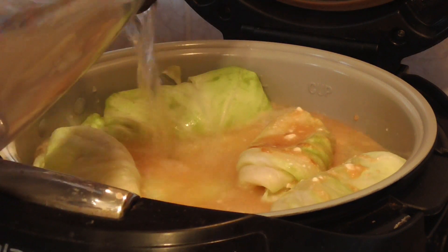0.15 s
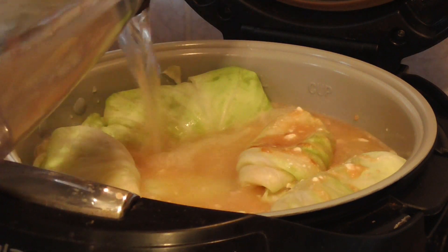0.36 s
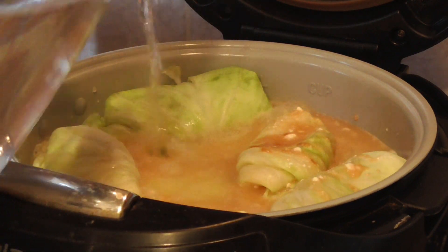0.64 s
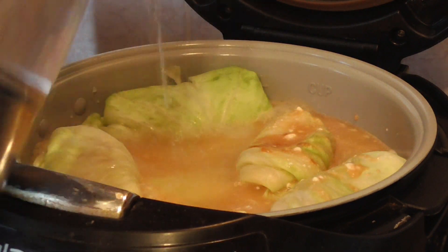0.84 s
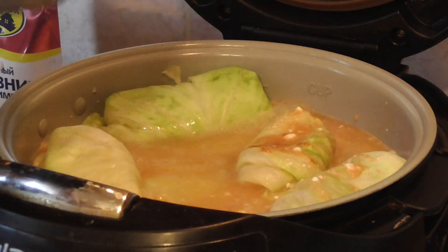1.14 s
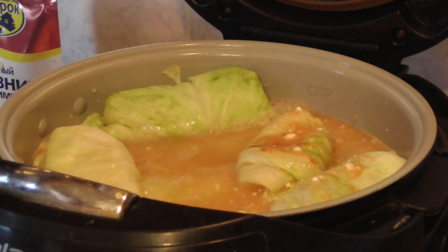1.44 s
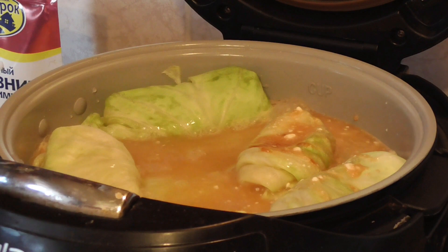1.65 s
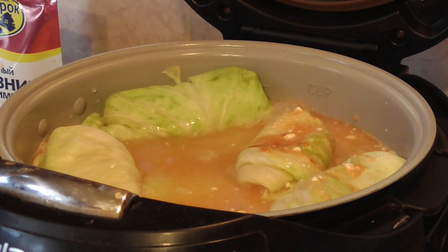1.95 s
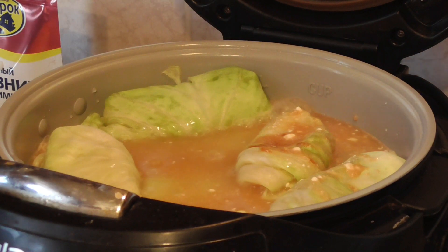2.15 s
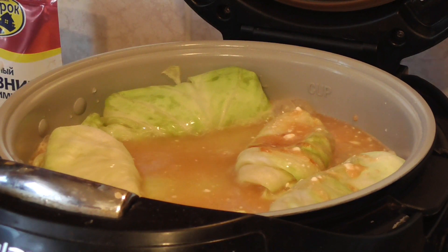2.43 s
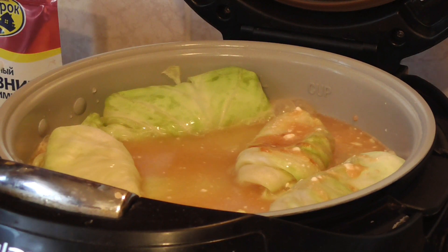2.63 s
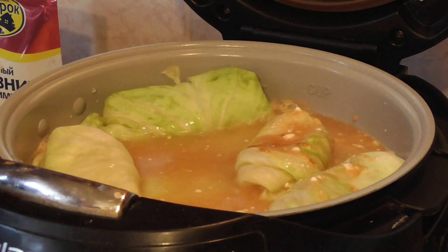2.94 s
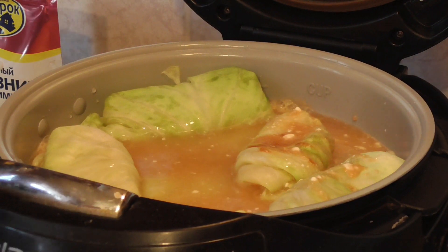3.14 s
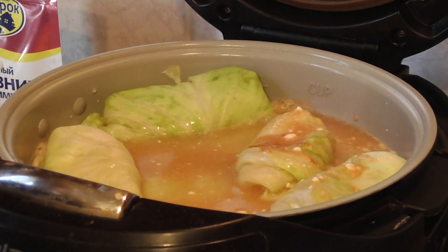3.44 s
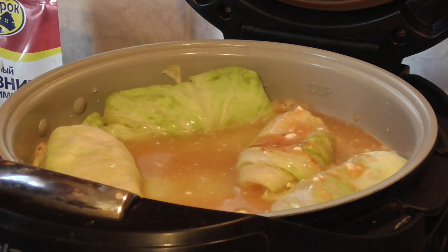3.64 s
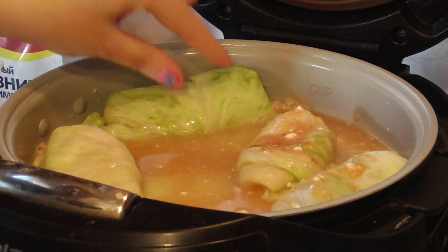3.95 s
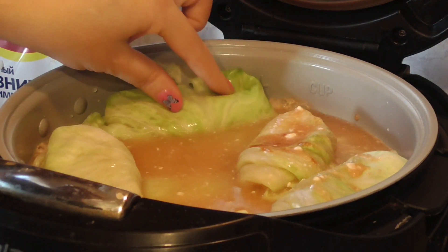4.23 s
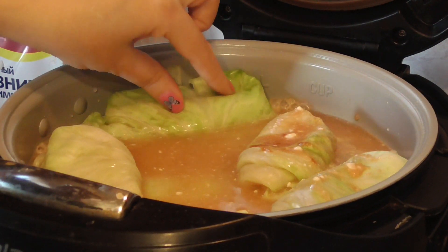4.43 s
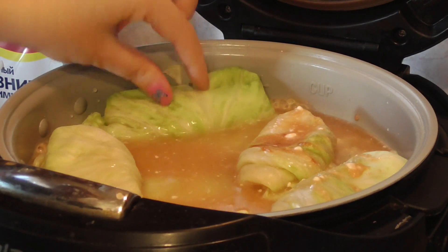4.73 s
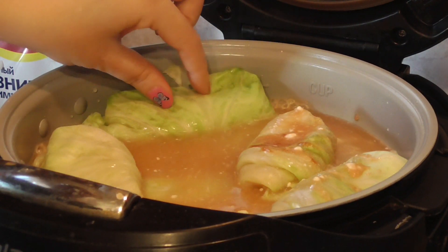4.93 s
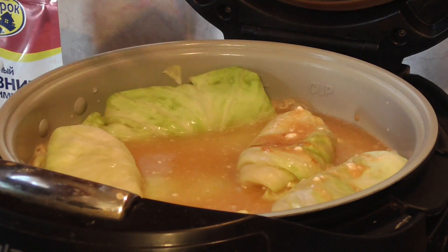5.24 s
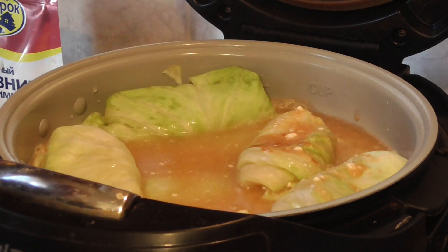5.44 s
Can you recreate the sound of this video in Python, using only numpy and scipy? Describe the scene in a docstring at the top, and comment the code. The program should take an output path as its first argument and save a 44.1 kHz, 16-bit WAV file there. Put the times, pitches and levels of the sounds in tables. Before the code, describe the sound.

Water pours from a jug into a pot of sauce, spitting and bubbling for about a second while the jug bumps the cooker twice. The jug is then set down on the worktop, slightly to the left, rocking and landing with loud, hollow knocks that leave a metal vessel ringing faintly. Soft handling bumps and tiny wet ticks follow, heard close up in a small kitchen with a low fridge hum.

```python
"""Water runs from a jug into a pot of sauce: its last stream spits and slops as swarms of ringing
bubbles, then foam fizzes on. The jug bumps the cooker twice, booming its housing. Set down on the
worktop, it rocks and lands hard, leaving a metal vessel ringing. Small handling noises and wet
ticks follow in a small kitchen where a fridge compressor hums."""
import sys
import numpy as np
from scipy import signal
from scipy.fft import rfft, irfft, next_fast_len
from scipy.io import wavfile

SR = 44100
rng = np.random.default_rng(int(sys.argv[2]) if len(sys.argv) > 2 else 0)


def wrap_up_sound(samples):
    """Save the sound to the file named by the first command line argument, as 16-bit audio."""
    columns = np.atleast_2d(samples).T
    # keep every value between -1 and 1, then stretch to whole-number steps
    tamed = np.clip(columns, -1, 1)
    steps = np.round(tamed * 32767).astype(np.int16)
    wavfile.write(sys.argv[1], SR, steps)


N = 246078
TIME = np.arange(N) / SR
HIT_TIME = TIME[:16384]

# stream envelope: (time [s], spray level [dB], relative slop level [dB])
POUR = [(0.0, -50, -60), (0.296, -69, -47.5), (0.45, -55, -51), (0.8, -59, -47.5), (0.876, -50.5, -58),
        (1.012, -51, -77), (1.15, -84, -56)]
# spray spectrum: (frequency [Hz], gain [dB])
SPRAY_EQ = [(500, 2), (1300, -3), (2000, -8), (2700, -7), (3500, 1), (4600, 1.5), (6000, -2.5), (8000, 1),
            (9500, 2), (12500, 0), (15500, -13)]
# sauce spectrum: (frequency [Hz], gain [dB])
SLOP_EQ = [(200, -3), (450, 3.5), (900, -7), (1300, 0.5), (1800, -1), (2100, -3), (3000, -24), (6000, -29)]
POUR_END_S = 0.97

def stream():
    """The stream whips up fine spray and slops in thick sauce, which damps its bubbles quickly."""
    s, spray_db, slop_db = np.transpose(POUR)
    running = np.interp(TIME, [POUR_END_S, POUR_END_S + 0.51], [1, 0])
    spray = bubbles(1.3, 1200, 16400, cycles=11, spread_db=5.6, count=5200)
    plips = bubbles(1.3, 700, 2300, cycles=16, spread_db=4, count=450)
    pats = bubbles(1.3, 350, 3000, cycles=6, spread_db=4.8, count=750)
    spray = colour(spray, SPRAY_EQ) * undb(np.interp(TIME, s, spray_db))
    slop = colour(pats + undb(-1) * plips, SLOP_EQ) * undb(np.interp(TIME, s, slop_db) - 11.5)
    return running * (spray + slop)


# fizz spectrum: (frequency [Hz], gain [dB])
FOAM_EQ = [(2000, -3), (4500, -8), (6000, -7), (8000, -3.5), (10000, 3), (12500, 3), (15500, -7.5)]
FOAM_DB, FOAM_FALL_DB_PER_S = -62.5, 4.5

def foam():
    """Tiny bubbles fizz and thin out after the pour; larger ones fade as the sauce settles."""
    fizz = bubbles(N / SR, 3430, 16200, cycles=5.4, spread_db=2.7, count=7000)
    fizz_db = FOAM_DB - FOAM_FALL_DB_PER_S * np.maximum(TIME - POUR_END_S, 0)
    settling = bubbles(2.3, 450, 2600, cycles=10, spread_db=5, count=300)
    return colour(fizz, FOAM_EQ) * undb(fizz_db) + settling * undb(-65 - 8 * TIME)


# loudest drops and bursting bubbles: (time [s], level [dB], pitch [Hz])
DROPS = [(0.0217, -49, 10200), (0.033, -44.5, 9500), (0.235, -66, 3580), (0.268, -58, 10000),
         (0.2749, -43, 9500), (.295, -53, 12100), (0.3192, -49.5, 10100), (0.369, -47, 9600),
         (0.378, -38.5, 9250), (0.4066, -54, 1240), (0.4316, -51, 12300), (.535, -48, 10500),
         (.558, -50, 9500), (.582, -51, 10500), (0.62, -37, 12200), (0.71, -45, 11700), (.739, -44, 8800),
         (.808, -37.5, 4130), (0.841, -40.5, 9600), (0.8464, -39, 11500), (0.874, -43.5, 3500),
         (0.8877, -46, 4400), (.924, -43.5, 12200), (.932, -43, 6800), (0.959, -48, 11400),
         (1.499, -64, 10900), (1.945, -62, 11900), (2.189, -58, 8140), (3.132, -63, 7000),
         (3.593, -59, 12700), (3.611, -54, 8000), (4.074, -66, 13900), (4.116, -67.5, 7340),
         (4.615, -65.5, 11950), (4.619, -60, 1070), (4.66, -70, 13000), (4.678, -62, 6400),
         (5.01, -72, 12300), (5.311, -59, 6800), (5.505, -64, 8600)]
SPLAT_HZ, DRIBBLE_S = 9500, 0.26

def drops():
    """Spits, last drips and lone bursting bubbles; big, low drops ring less and splat more and lower."""
    out = np.zeros(N)
    spits = scatter(0, POUR_END_S, db=-53.5, spread_db=4.5, low_hz=5500, high_hz=13000, count=20)
    ticks = scatter(POUR_END_S, N / SR, db=-68, spread_db=2, low_hz=8000, high_hz=14000, count=10)
    drips = scatter(POUR_END_S, POUR_END_S + DRIBBLE_S, db=-56, spread_db=3,
                    low_hz=1000, high_hz=2600, count=5)
    for s, db, hz in DROPS + spits + drips + ticks:
        splat_share = SPLAT_HZ / np.hypot(SPLAT_HZ, hz)
        ping = burst(np.convolve(bubble(hz, cycles=27, glide=0.13), rattle(0.0017)[:512]))
        spit = burst(colour(rattle(0.023)[:2048], SPRAY_EQ))
        pat = burst(colour(rattle(0.031)[:2048], SLOP_EQ))
        add(out, s, undb(db) * np.sqrt(1 - splat_share ** 2) * ping)
        add(out, s, undb(db - 4) * splat_share * burst(spit + 2200 / hz * pat))
    return out


# splashes that drag air under: (time [s], level [dB], bubble pitch [Hz])
SPLASHES = [(0.113, -70, 3230), (.119, -56, 3540), (0.235, -52, 3070), (0.236, -51, 1660),
            (.25, -50.5, 4400), (.262, -50.5, 4500), (.284, -51, 1400), (.341, -56, 3730),
            (.406, -44, 1210), (.406, -52, 3540), (0.426, -50, 1000), (.471, -50.5, 3900),
            (.509, -51, 3880), (0.5786, -52, 4400), (0.636, -44.5, 900), (.639, -48.5, 1930),
            (.666, -46.5, 750), (0.74, -51, 1430), (.78, -48.5, 4450), (.791, -49.5, 1500),
            (.808, -52, 4200), (.809, -52, 1900), (0.886, -41.5, 4400), (.886, -45.5, 940),
            (.922, -57, 3400), (0.942, -55, 4200), (0.952, -48.5, 3950), (0.995, -60, 4140),
            (1.012, -64, 4530), (1.034, -64, 3920)]
SPLASH_S, SPLASH_OCTAVES, SPLASH_CYCLES = 0.009, 0.66, 11

def splashes(bubbles_each):
    """Each splash traps a cluster of unlike bubbles, the first the strongest."""
    out = np.zeros(N)
    for s, db, hz in SPLASHES:
        cluster = np.zeros(4096)
        for k, (pitch, life) in enumerate(rng.random((bubbles_each, 2))):
            share, stretch = k / bubbles_each, 0.5 + life
            octaves = SPLASH_OCTAVES * (2 * pitch - 1) * np.sqrt(share)
            ringing = bubble(hz * 2 ** octaves, SPLASH_CYCLES * stretch, glide=0.2)
            add(cluster, SPLASH_S * share * stretch, (1 - share / 2) * ringing)
        add(out, s, undb(db) * burst(cluster))
    return out


# jug on cooker: (time [s], level [dB], brightness [Hz], boom level [dB], rebound gap [s])
BUMPS = [(0.54, -32, 915, -26.5, .018), (0.9187, -24.5, 1750, -50, .0108)]
# cooker resonances: (frequency [Hz], level [dB], t60 [s])
COOKER_MODES = [(183.5, -14.5, 0.33), (245.6, -4.5, 0.27), (370, -9, 0.064), (482, -6.5, 0.079),
                (519, -3.5, 0.09), (562, -8.5, 0.1), (661, 3.5, 0.029), (796, -1.5, 0.043),
                (856, -15, 0.06), (957, -6, 0.043), (1200, 1, 0.028), (1270, -2.5, 0.03)]
# spectrum of its dense modes: (frequency [Hz], gain [dB])
COOKER_EQ = [(50, -10.5), (200, -3), (330, -7.5), (600, 1.5), (850, -2), (1050, -10), (1300, -6.5),
             (1800, -19), (4500, -8.5), (12000, -14.5)]
BOOM_HZ, BOOM_T60_S = 113, 0.06
REBOUND_DB, REBOUND_DULLING = -3.5, 0.51

def cooker():
    """The jug clunks on the cooker and booms its housing; each rebound is weaker and duller."""
    out = np.zeros(N)
    boom = burst(ring([(BOOM_HZ, 0, BOOM_T60_S), (76, -14, 0.15)]))
    for s, db, bright_hz, boom_db, gap_s in BUMPS:
        for k in range(4):
            body = burst(ring(COOKER_MODES)) + undb(4.5) * burst(colour(rattle(0.11), COOKER_EQ))
            clunk = burst(soften(body, bright_hz * REBOUND_DULLING ** k))
            add(out, s + k * gap_s, undb(k * REBOUND_DB) * (undb(db) * clunk + undb(boom_db) * boom))
    return out


# jug resonances: (frequency [Hz], level [dB], t60 [s])
JUG_MODES = [(428, 7.5, 0.054), (592, 7.5, 0.077), (743, -2.5, 0.055), (939, -2.5, 0.1), (1070, -7, 0.051),
             (1340, 3, 0.038), (1500, 2, 0.015), (1950, -12, 0.096)]
# jug radiation: (frequency [Hz], gain [dB])
JUG_EQ = [(50, -9), (200, -9), (380, -9), (16000, 0)]

def jug():
    """One blow on the jug: the hand damps it, and its small body radiates little bass."""
    return burst(colour(struck(JUG_MODES, loss_factor=0.0073), JUG_EQ))


# jug on worktop: (time [s], relative level [dB], hardness [0-1], worktop re jug [dB],
# cupboard thud re blow [dB], pitch the spot favours [Hz])
KNOCKS = [(1.565, -51.5, 0.2, 0, -20, 800), (2.0996, -51.5, 0.95, -27, -31, 2110),
          (2.2431, -21, 0.34, -22, -33, 468), (2.2495, -28.5, 0.16, -21, -38, 1340),
          (2.2889, -19, 0.24, -18, -20, 636), (2.303, -35, 0.66, -12, -20, 600),
          (2.3163, -19, 0.46, -17, -21, 450), (2.3208, -23, 0.04, -4, -25, 455),
          (2.337, -22, 0.4, -1, -9, 570), (2.370, -29, 0, -22, -19, 480),
          (2.387, -26, 0.38, -3.5, -6.5, 560), (2.538, -32.5, 0.16, -15, -28, 500),
          (2.556, -26, 0.14, 0, -14, 563), (2.567, -26, 0.5, -6, -29, 606),
          (2.575, -13.5, 0.6, 6, -20, 890), (2.5845, -23, 0.99, 4, -9, 590),
          (2.610, -31.5, 0.1, 5, -20, 350), (2.614, -22, 0.47, 3, -13, 327)]
# worktop resonances: (frequency [Hz], level [dB], t60 [s])
WORKTOP_MODES = [(119.3, -14.5, 0.4), (199.5, -14, 0.24), (225.7, -9, 0.59), (258.7, -0.5, 0.39),
                 (292, 3, 0.24), (374, 5, 0.3), (420, -9, 0.08), (588, 8.5, 0.054), (719, 8, 0.13),
                 (750, -6, 0.16), (910, 9.5, 0.032), (1056, -2, 0.21), (1278, -6.5, 0.186), (1380, 4, 0.1),
                 (1590, -9, 0.074), (2010, -2, 0.05), (2130, -8, 0.074), (2390, -2, 0.056)]
# spectrum of its dense modes: (frequency [Hz], gain [dB])
WORKTOP_EQ = [(40, -51), (150, -34), (300, -9), (520, 1.5), (900, -2), (1170, -8), (1400, -9),
              (1900, -12.5), (3100, -13), (4300, -8), (12000, -27)]
# contact crack spectrum: (frequency [Hz], gain [dB])
CRACK_EQ = [(60, -40), (250, -21), (700, -24.5), (2100, 5.5), (3100, -13), (4600, 3.5), (6200, -1),
            (7600, 5), (10000, 2.5), (13000, 1), (16000, -11.5)]
# cupboard spectrum: (frequency [Hz], gain [dB])
THUD_EQ = [(30, -5), (65, -12), (115, -3), (150, 3.5), (260, 1.5), (500, -42.5)]
SOFT_HZ, HARD_HZ, SOFT_CRACK_DB, HARD_CRACK_DB = 1400, 4400, -31.5, 1.5
SPOT_LIFT_DB = 5.5

def worktop():
    """Blows ring the jug; flat ones also shake worktop and cupboard; hard ones are bright and crack."""
    out = np.zeros(N)
    for s, db, hardness, board_db, thud_db, spot_hz in KNOCKS:
        bright_hz = SOFT_HZ * (HARD_HZ / SOFT_HZ) ** hardness
        crack_db = between(SOFT_CRACK_DB, HARD_CRACK_DB, hardness)
        hollow = jug()
        board = burst(struck(WORKTOP_MODES, loss_factor=0.0068))  # damped by the jug
        dense = burst(colour(rattle(0.04), WORKTOP_EQ))
        body = burst(hollow + undb(board_db) * board) + undb(0.5) * dense
        body = colour(body, [(spot_hz / 1.23, 0), (spot_hz, SPOT_LIFT_DB), (spot_hz * 1.29, 0)])
        snap = undb(2) * rattle(0.00053)
        crack = burst(colour(snap + rattle(0.023) + undb(-4) * rattle(0.047), CRACK_EQ))
        crack = undb(crack_db) * soften(crack, 3.76 * bright_hz)
        thud = undb(thud_db) * burst(colour(rattle(0.061), THUD_EQ))
        add(out, s, undb(db - 1.5) * (burst(soften(body, bright_hz)) + crack + thud))
    return out


# rocking envelope: (time [s], relative level [dB])
CHATTER = [(2.295, -39), (2.33, -33.5), (2.36, -34.5), (2.389, -36), (2.44, -55)]
CHATTER_BRIGHT_HZ = 1740

def chatter(contacts):
    """Small contacts of the rocking base run together and keep the hollow jug ringing."""
    s, db = np.transpose(CHATTER)
    out = np.zeros(N)
    for k, late in enumerate(rng.random(contacts)):
        at_s = between(s[0], s[-1], (k + late) / contacts)
        contact = jug() + burst(colour(rattle(0.016), WORKTOP_EQ))
        add(out, at_s, undb(np.interp(at_s, s, db) - 2) * burst(soften(contact, CHATTER_BRIGHT_HZ)))
    return out


# metal vessel resonances: (frequency [Hz], level [dB], t60 [s])
VESSEL_MODES = [(509.5, -39.5, 2.03), (1030, -52, 1.5), (1050, -56, 1.4), (1330, -66, 2.4)]
VESSEL_START_S, VESSEL_SWELL_S = 2.576, 0.33

def vessel():
    """Thin metal takes up the shaking after the strongest blow, swells and sings on."""
    swell = np.clip(TIME / VESSEL_SWELL_S, 0, 1) ** 2
    tone = sum(undb(db) * fade(TIME, t60) * np.sin(2 * np.pi * hz * TIME)
               for hz, db, t60 in VESSEL_MODES)
    out = np.zeros(N)
    add(out, VESSEL_START_S, swell * tone)
    return out


# slides: (time [s], length [s], relative level [dB])
BRUSHES = [(2.299, 0.16, -49.5), (2.526, 0.16, -48.5), (3.597, 0.1, -54.5), (3.987, 0.1, -59)]
# sliding spectrum: (frequency [Hz], gain [dB])
BRUSH_EQ = [(200, -12), (600, 24), (1300, 19.5), (2700, 11.5), (4300, 15.5), (6000, 10.5), (8000, 15.5),
            (12000, 10.5), (15500, -23)]

def brushes():
    """Things slide and brush: grainy noise that swells quickly and dies away."""
    out = np.zeros(N)
    for s, length_s, db in BRUSHES:
        size = int(length_s * SR)
        grain = rng.standard_normal(size) * undb(0.55 * rng.standard_normal(size))
        envelope = np.interp(np.arange(size) / size, [0, 0.2, 1], [0, 1, 0])
        add(out, s, undb(db + 2.5) * unit(colour(grain, BRUSH_EQ)) * envelope)
    return out


# dull handling bumps: (time [s], level [dB], pitch [Hz])
THUMPS = [(3.209, -46.5, 377), (3.232, -52, 250), (3.269, -43.5, 373), (3.974, -44, 488), (4.04, -54, 503)]
THUMP_T60_S = 0.025

def thumps():
    """Things nudged by a hand: a soft push into two damped modes."""
    out = np.zeros(N)
    for s, db, hz in THUMPS:
        body = ring([(hz, 0, THUMP_T60_S), (hz * 1.47, -6, THUMP_T60_S / 2)])
        add(out, s, undb(db) * burst(soften(body, 2 * hz)))
    return out


# compressor hum: (harmonic [x shaft rate], rms level [dB])
HUM = [(1, -78), (2, -74), (3, -68), (4, -62.5), (5, -74), (6, -56), (7, -62), (8, -71), (9, -77.5),
       (10, -85), (11, -80)]
# whine tones: (frequency [Hz], rms level [dB])
WHINE = [(886, -80), (1034, -76.5), (1180, -75.5), (1330, -80), (1922, -85.5), (3246, -98.5), (3494, -84.5),
         (4576, -91)]
SHAFT_HZ = 49.35

def fridge():
    """The compressor throbs once a turn, wavering slightly, with a faint whine."""
    turns = SHAFT_HZ * TIME + 0.0019 * np.sin(2 * np.pi * (0.79 * TIME + rng.random()))
    hum = sum(undb(db) * np.cos(2 * np.pi * k * turns) for k, db in HUM)
    whine = sum(undb(db) * np.sin(2 * np.pi * (hz * TIME + rng.random())) for hz, db in WHINE)
    return np.sqrt(2) * (hum + whine)


# air spectrum: (frequency [Hz], gain [dB])
AIR_EQ = [(25, -20), (60, -17), (120, -2.5), (180, -2), (245, 8), (420, -5), (700, -5.5), (1130, -6.5),
          (1700, -18), (2050, -20.5), (2600, -23.5), (3500, -20), (4000, -23), (4600, -21), (5700, -30),
          (8000, -22.5), (10000, -23), (15000, -27.5)]
AIR_DB = -57

def air():
    """A soft rush of air from all sides."""
    return undb(AIR_DB) * unit(colour(diffuse(N), AIR_EQ))


# early reflection spectrum: (frequency [Hz], gain [dB])
NEARBY_EQ = [(300, 0.5), (700, -15.5), (1400, -11.5), (4000, 0)]

def nearby(x, t60_s):
    """Quick reflections from close surfaces."""
    t = TIME[:4096]
    echo = diffuse(len(t)) * fade(t, t60_s) * np.clip(t / 0.0022, 0, 1)
    return reflect(x, echo, NEARBY_EQ)


# room decay: (frequency [Hz], t60 [s])
ROOM_T60 = [(60, 1), (200, 0.42), (500, 0.4), (2000, 0.6), (5000, 0.49), (12000, 0.28)]
# room spectrum: (frequency [Hz], gain [dB])
ROOM_EQ = [(50, 0), (130, -3), (240, 6.5), (450, 2.5), (1000, 2.5), (1170, 1), (1350, 1), (1800, -3.5),
           (3000, -0.5), (8000, 1.5), (15000, 1)]

def kitchen(x):
    """Dense reflections build within milliseconds; the top treble dies first."""
    size = 32768
    t, spectrum = TIME[:size], rfft(diffuse(size))
    tail = 0
    for hz, t60 in ROOM_T60:
        band = along([(f, float(f == hz)) for f, _ in ROOM_T60], size)
        tail = tail + irfft(spectrum * band) * fade(t, t60)
    onset = np.clip((t - 0.002) / 0.0074, 0, 1)
    return reflect(x, tail * onset, ROOM_EQ)


# diffuse field, left to right: (frequency [Hz], coherence [0-1])
COHERENCE = [(100, 0.78), (400, 0.65), (1000, 0.37), (2200, 0.2), (5000, 0.3), (8000, 0.028),
             (14000, 0.079)]

def diffuse(size):
    """Stereo noise from all sides: alike in the bass, unrelated in the treble."""
    mid, side = rfft(rng.standard_normal((2, size)))
    alike = along(COHERENCE, size)
    mid, side = mid * np.sqrt((1 + alike) / 2), side * np.sqrt((1 - alike) / 2)
    return irfft(np.array([mid + side, mid - side]), size)


# shadowing between channels: (frequency [Hz], share of the pan [0-1])
SHADOW = [(100, 0), (500, 0.9), (1200, 0.71), (3000, 0.86), (7000, 0.17), (12000, 0.21)]

def place(x, pan_db, lead_ms):
    """A source to the left reaches the left channel sooner and, in the midrange, louder."""
    size = next_fast_len(N + 1024, True)
    hz = np.fft.rfftfreq(size, 1 / SR)
    shade = undb(pan_db / 2 * along(SHADOW, size))
    delay = np.exp(-2j * np.pi * hz * lead_ms / 1000)
    return irfft(rfft(x, size) * np.array([shade, delay / shade]), size)[:, :N]


def reflect(x, echo, eq):
    """Convolve with a stereo echo, normalised in energy, then coloured."""
    echo = colour(echo / np.sqrt(np.sum(echo ** 2) / 2), eq)
    return signal.fftconvolve(x[None], echo, axes=1)[:, :N]


def bubble(hz, cycles, glide):
    """A pinched-off bubble rings and rises in pitch as it nears the surface."""
    life_s = cycles / hz
    t = TIME[:int(life_s * SR) + 2]
    return fade(t, life_s) * np.sin(2 * np.pi * hz * t * (1 + glide * t / life_s / 2))


def bubbles(until_s, low_hz, high_hz, cycles, spread_db, count):
    """A swarm of bubbles, many faint and a few loud, at rms 1."""
    out = np.zeros(N)
    for when, pitch, strength, life in rng.random((count, 4)):
        gain = undb(-spread_db * np.log(1 - 0.98 * strength))
        hz = low_hz * (high_hz / low_hz) ** pitch
        add(out, when * until_s, gain * bubble(hz, cycles * (0.5 + life), glide=0.31))
    return out / np.sqrt(np.mean(out[:int(until_s * SR)] ** 2))


def scatter(from_s, until_s, db, spread_db, low_hz, high_hz, count):
    """Random drops: (time [s], level [dB], pitch [Hz])."""
    return [(between(from_s, until_s, when), db + spread_db * (2 * strength - 1),
             low_hz * (high_hz / low_hz) ** pitch) for when, strength, pitch in rng.random((count, 3))]


def ring(modes):
    """Decaying sines of a struck body; neighbouring modes swing in opposite directions."""
    return sum((-1) ** k * undb(db) * fade(HIT_TIME, t60) * np.sin(2 * np.pi * hz * HIT_TIME)
               for k, (hz, db, t60) in enumerate(modes))


def struck(modes, loss_factor, spread_db=2.3, detune=0.0079):
    """Each blow lands on another spot, weighting and shifting the modes; high ones are damped most."""
    damped = []
    for hz, db, t60 in modes:
        shift, weight = rng.standard_normal(2)
        damped_t60 = 1 / (1 / t60 + np.pi * hz * loss_factor / np.log(1000))
        damped.append((hz * (1 + detune * shift), db + spread_db * weight, damped_t60))
    return ring(damped)


def rattle(t60_s):
    """Modes too dense to tell apart: decaying noise."""
    return rng.standard_normal(len(HIT_TIME)) * fade(HIT_TIME, t60_s)


def soften(x, hz):
    """A softer, longer contact takes the treble away."""
    return signal.sosfilt(signal.butter(2, min(hz, SR / 3), fs=SR, output="sos"), x)


def colour(x, eq):
    """Minimum-phase filter through (frequency [Hz], gain [dB]) points."""
    size = next_fast_len(x.shape[-1] + 4096, True)
    cepstrum = irfft(np.log(undb(along(eq, size))), size)
    cepstrum[1:size // 2] *= 2
    cepstrum[size // 2 + 1:] = 0
    return irfft(rfft(x, size) * np.exp(rfft(cepstrum)), size)[..., :x.shape[-1]]


def along(points, size):
    """Interpolate (frequency [Hz], value) points at the FFT bins."""
    hz, value = np.transpose(points)
    return np.interp(np.log(np.fft.rfftfreq(size, 1 / SR) + 1), np.log(hz), value)


def undb(db):
    """Decibels to gain."""
    return 10 ** (np.asarray(db) / 20)


def unit(x):
    """Scale to rms 1."""
    return x / np.sqrt(np.mean(x ** 2))


def burst(x):
    """Scale to the energy of 10 ms at rms 1."""
    return x / np.sqrt(np.sum(x ** 2) * 100 / SR)


def fade(t, t60_s):
    """Exponential decay."""
    return np.exp(-np.log(1000) * t / t60_s)


def between(low, high, share):
    """Linear blend."""
    return low + (high - low) * share


def add(track, s, sound):
    """Mix a sound in at time s."""
    i = max(int(s * SR), 0)
    track[i:i + len(sound)] += sound[:max(N - i, 0)]


def scene():
    """The pot is straight ahead and its walls throw the splashes back; the worktop is to the left."""
    pour = stream() + foam() + drops() + splashes(bubbles_each=9)
    bumps = cooker()
    knocks = worktop() + chatter(contacts=24)
    handling = brushes() + thumps()
    direct = (place(pour, pan_db=0, lead_ms=0)
              + place(bumps, pan_db=4.5, lead_ms=0.022)
              + place(knocks, pan_db=6, lead_ms=0.035)
              + place(vessel(), pan_db=6.5, lead_ms=0.02)
              + place(handling, pan_db=3.5, lead_ms=0.033))
    early = undb(-4) * (nearby(pour, t60_s=0.035) + nearby(knocks + bumps, t60_s=0.04))
    room = kitchen(undb(-7) * pour + undb(-13) * bumps + undb(-8.5) * knocks + undb(-6) * handling)
    return direct + early + room + fridge() + air()


# right channel response: (frequency [Hz], gain [dB])
RIGHT_EQ = [(300, 0.6), (4000, -0.5), (9000, 0), (13000, 1.5)]
LOW_CUT_HZ, HIGH_CUT_HZ = 52, 15750

def record(dry):
    """Deep bass thinned, top cut; the right channel is a little brighter."""
    stereo = np.array([dry[0], colour(dry[1], RIGHT_EQ)])
    stereo = signal.sosfilt(signal.butter(2, LOW_CUT_HZ, "high", fs=SR, output="sos"), stereo)
    return signal.sosfilt(signal.ellip(10, 0.2, 80, HIGH_CUT_HZ, fs=SR, output="sos"), stereo)


dry = scene()
out = record(dry)
wrap_up_sound(out)
```